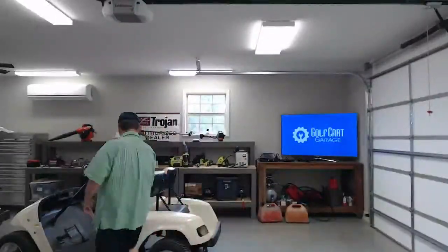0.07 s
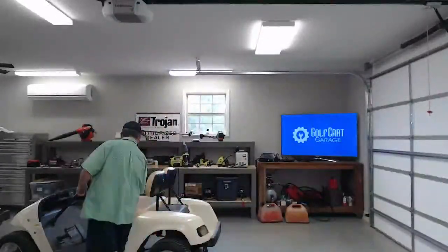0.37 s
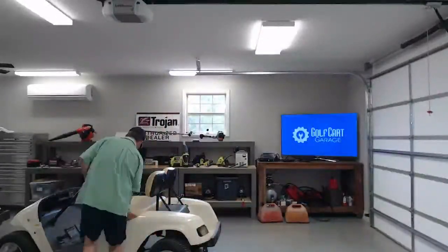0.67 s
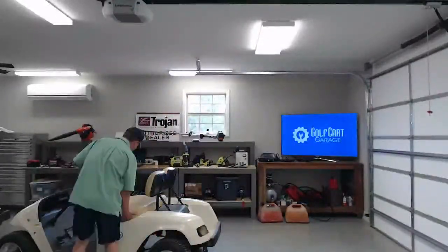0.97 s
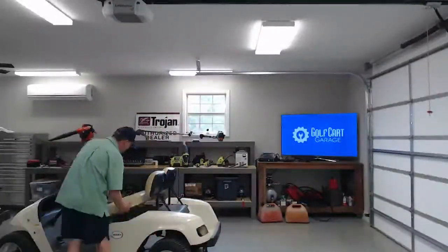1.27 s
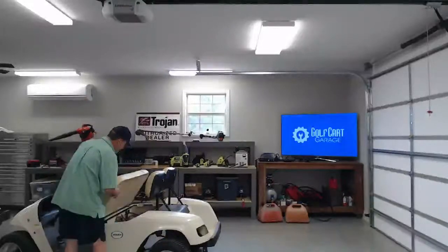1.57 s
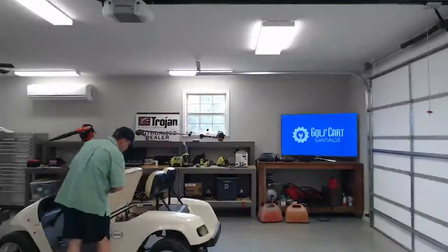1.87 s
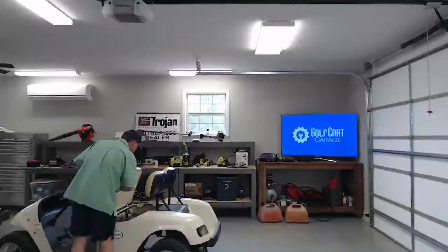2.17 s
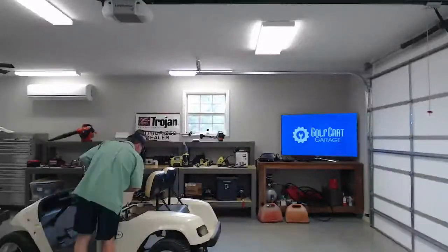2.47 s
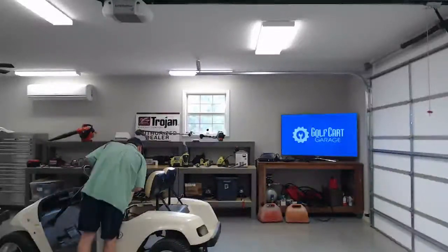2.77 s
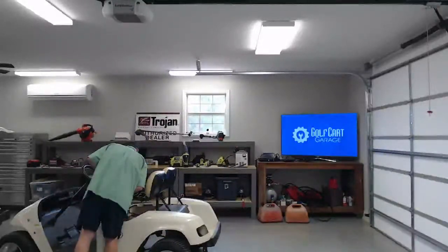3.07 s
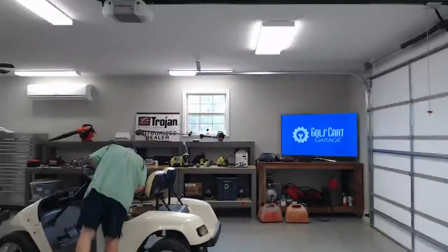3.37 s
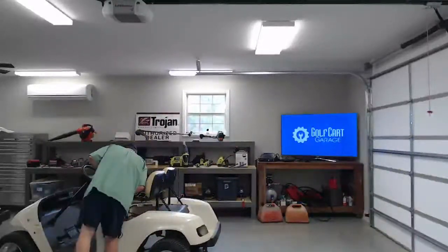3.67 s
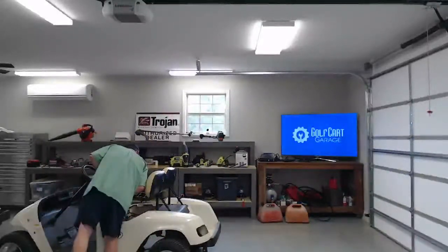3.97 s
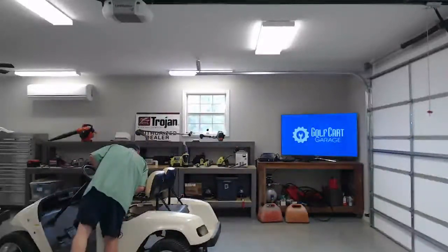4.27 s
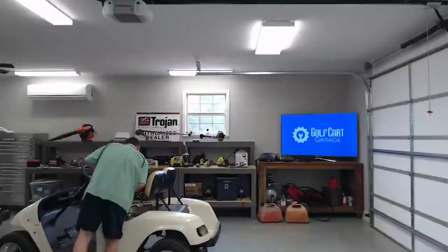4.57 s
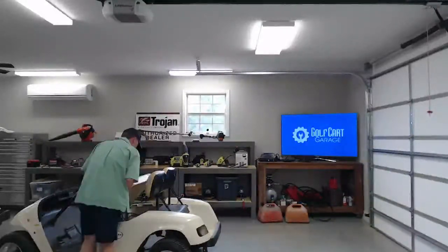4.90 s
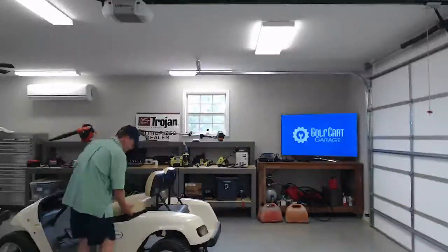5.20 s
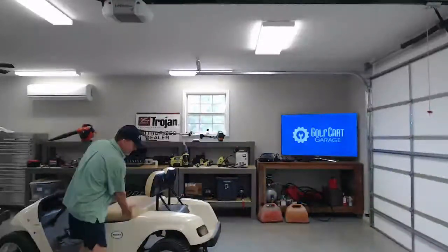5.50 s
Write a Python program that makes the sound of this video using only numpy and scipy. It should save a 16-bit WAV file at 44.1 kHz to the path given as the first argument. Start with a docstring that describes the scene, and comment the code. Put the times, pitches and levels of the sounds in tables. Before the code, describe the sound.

An air conditioner hums and blows steadily in a garage while someone lifts a golf cart seat: a quick run of hollow knocks, a short scrape, one more knock. After some soft, muffled rummaging, the seat is lowered, groaning briefly as it sticks on the plastic body, and lands with a bang, the loudest sound. The microphone hears it all a little from the left, with a short echo off the walls.

```python
"""A golf cart seat is tipped up in a bare garage and pulls out of its clips with a hollow clatter.
Hands rummage underneath; then the seat comes down, groans as it sticks and slips on the plastic body,
touches and drops home with a bang. Each blow is a crack, a knock, ringing panels and a hollow thump.
The hard walls answer every knock, and an air conditioner hums and blows all the while."""
import sys
import numpy as np
from scipy import signal
from scipy.fft import rfft, irfft, next_fast_len
from scipy.io import wavfile
from scipy.ndimage import map_coordinates

SR = 44100
rng = np.random.default_rng(int(sys.argv[2]) if len(sys.argv) > 2 else 0)


def log_audio(samples):
    """Write samples as a 16-bit WAV file to the path given in sys.argv[1]."""
    # one column per channel
    frames = np.atleast_2d(samples).T
    # limit to full scale, then quantise
    limited = np.clip(frames, -1, 1)
    pcm = np.round(limited * 32767).astype(np.int16)
    wavfile.write(sys.argv[1], SR, pcm)


N = 248724

# The clatter and the bang. Each row: start in seconds, then force, hardness and weight in dB.
SEAT_BLOWS = [(0.125, -60.5, -2, -11), (0.745, -42.5, -3, -11), (0.773, -39, -5.5, -5),
              (0.804, -34.5, 0.5, -6), (0.822, -39, -4, -1.5), (0.885, -48, 3, -2), (0.913, -51, -2, 2),
              (0.953, -45.5, 2.5, -6), (1.517, -50.5, 5.5, -2.5), (1.585, -65.5, -11, 13),
              (4.748, -52.5, -5.5, -1), (5.466, -41.5, -2.5, -1.5), (5.476, -40, -4.5, -8),
              (5.54, -46, -3, 3), (5.579, -32.5, -5, -3), (5.588, -26.5, 11.5, 3.5), (5.598, -26.5, -4, 9)]

def seat_blows():
    """The seat strikes the body; each part of the hit gets its own amount of wall echo."""
    out = np.zeros((2, N + SR))
    for start, force_db, hard_db, weight_db in SEAT_BLOWS:
        crack, knock, rings, thump = rocking(force_db, hard_db, weight_db, count=3)
        heard = garage(crack, wet_db=1.5) + garage(knock, wet_db=6)
        heard += garage(rings, wet_db=0.5) + garage(thump, wet_db=-5.5)
        out[:, round(start * SR):][:, :len(crack)] += heard
    return out[:, :N]


def rocking(force_db, hard_db, weight_db, count):
    """The seat hits and rocks back, each contact weaker, softer and with more weight behind it."""
    t = np.arange(SR * 3 // 4) / SR
    start, parts = 0, 0
    for k in range(count):
        age = np.maximum(t - start, 0)
        parts = parts + contact(age, force_db - 4 * k, hard_db - 5.5 * k, weight_db + 3.5 * k)
        start += 0.021 * 0.7 ** k  # ever shorter gaps
    return parts


# The edge's bright crack and dull knock. Each row: frequency in Hz, relative level in dB.
CRACK_SPECTRUM = [(300, -24.5), (900, -9), (1650, 1.5), (2500, 0.5), (3300, -2), (4700, -9.5), (5450, -8.5),
                  (6400, -13), (7600, -22.5), (8600, -42.5)]
KNOCK_SPECTRUM = [(60, -19), (150, 0.5), (350, -4), (550, -4), (800, -5.5), (1200, -10.5), (1700, -15.5),
                  (2500, -23), (5000, -29.5), (8500, -50.5)]
# The ring of the plastic panels, the board under the cushion and the hollow body.
# Each row: frequency in Hz, relative level in dB, seconds to fade by 60 dB.
PANEL_MODES = [(340, -4.5, 0.15), (405.3, -3.5, 0.19), (456, -2.5, 0.079), (501.6, 1, 0.089),
               (577, -9, 0.13), (652, -8.5, 0.1), (850, -7.5, 0.12), (980, -12, 0.19), (1273, -22, 0.081)]
BOARD_MODES = [(203, -22, 0.091), (296.5, 1.5, 0.12), (1420, -19, 0.055), (1577, -11, .06),
               (1680, -10.5, 0.08), (1780, -9, 0.046), (2210, -19.5, 0.033), (2497, -11, .05)]
HOLLOW_MODES = [(78, 3, 0.15), (101, -8.5, 0.11), (129.1, -1, 0.28), (166, -4, 0.14), (202, -10, 0.14)]

def contact(t, force_db, hard_db, weight_db):
    """The edge cracks, knocks and rings the panels; then the weight thumps the body and the board."""
    tilt_db = 0.5 - 0.25 * weight_db  # a heavy contact lasts longer, which dulls the crack
    crack = amp(-4 + hard_db) * burst(CRACK_SPECTRUM, t, t60=0.071, tilt_db=tilt_db) * rise(t, 0.00048)
    knock = burst(KNOCK_SPECTRUM, t, t60=0.057) * rise(t, 0.00082)
    # Weight flexes the panels more; a hard contact also reaches the board.
    panels = amp(-5.5 + 0.47 * weight_db) * ring(PANEL_MODES, t, scatter_db=3.5)
    late = np.maximum(t - 0.005, 0)  # the weight follows the edge
    board = amp(-12 + 1.16 * hard_db + weight_db) * ring(BOARD_MODES, late, scatter_db=2.5)
    thump = amp(-2 + weight_db) * ring(HOLLOW_MODES, late, scatter_db=3.5) * rise(late, 0.003)
    return amp(force_db) * np.array([crack, knock, panels + board, thump])


def burst(spectrum, t, t60, tilt_db=0):
    """Crowded modes that die quickly, as a noise burst tilted by tilt_db per octave."""
    tilted = [(hz, db + tilt_db * np.log2(hz)) for hz, db in spectrum]
    return coloured(rng.standard_normal(len(t)), tilted) * amp(-60 * t / t60)


def ring(modes, t, scatter_db):
    """Damped modes, struck at new strengths each time; neighbours swing in opposite directions."""
    hz, db, t60 = np.transpose(modes)[:, :, None]
    polarity = (-1) ** np.arange(len(hz))[:, None]
    gain = polarity * amp(db + scatter_db * rng.standard_normal(hz.shape))
    return np.sum(gain * amp(-60 * t / t60) * np.sin(2 * np.pi * hz * t), axis=0)


# The groan on the way down. Each row: start and length in seconds, level in dB, slips per second.
GROAN_STROKES = [(4.996, 0.049, -33, 134), (5.037, 0.067, -31.5, 130), (5.119, 0.061, -34, 124),
                 (5.189, 0.035, -45.5, 150)]
# Body modes shaken by the groan. Each row: frequency in Hz, level in dB relative to the low note.
SHAKEN_MODES = [(118, -18), (163, -11.5), (178, -11), (196, -17), (232, -22.5)]

def seat_groan():
    """The seat sticks and slips on the body; uneven slips shake other modes around the low note."""
    t, out = np.arange(N) / SR, np.zeros(N)
    shaken = sum(amp(db) * np.sin(2 * np.pi * hz * t + 1.6 * wobble(20)) for hz, db in SHAKEN_MODES)
    for start, length, db, slip_hz in GROAN_STROKES:
        pitch = slip_hz * (1 + 0.011 * wobble(40))
        note = np.sin(2 * np.pi * np.cumsum(pitch) / SR)
        out += amp(db) * stroke(start, length, attack_s=0.018, release_s=0.015) * (note + shaken)
    return garage(out, wet_db=-10.0)


# Scrapes as the seat goes up. Each row: start and length in seconds, level in dB.
SLIDE_STROKES = [(0.0, .12, -66), (.24, .03, -64), (.32, 0.26, -69), (1.257, 0.049, -48.5),
                 (1.325, 0.069, -58), (1.41, 0.067, -62)]
# Their raspy colour. Each row: frequency in Hz, relative level in dB.
SCRAPE_SPECTRUM = [(150, -22), (600, -17), (850, -1), (1170, 0.5), (1450, -6), (1800, -2), (2400, -8.5),
                   (3500, -9), (4700, -14.5), (5500, -13.5), (6700, -18.5), (8300, -35)]

def seat_slide():
    """The seat slides out of its clips and sleeves brush it."""
    gain = strokes(SLIDE_STROKES, attack_s=0.035, release_s=0.03)
    return rubbing(gain, SCRAPE_SPECTRUM, grain_db=4, grain_rate=160)


# Rubs as the seat comes down. Each row: start and length in seconds, level in dB.
CUSHION_STROKES = [(4.9, 0.12, -65), (5.0, .12, -58.5), (5.12, 0.083, -56.5), (5.38, .2, -67)]
# The swish of vinyl. Each row: frequency in Hz, relative level in dB.
VINYL_SPECTRUM = [(300, -8), (600, -7), (1000, -2.5), (1700, -2.5), (2050, -4.5), (2400, -3), (3200, -13.5),
                  (5500, -15), (8300, -31)]

def cushion_rub():
    """The vinyl cushion rubs down the backrest."""
    gain = strokes(CUSHION_STROKES, attack_s=0.025, release_s=0.031)
    return rubbing(gain, VINYL_SPECTRUM, grain_db=2.0, grain_rate=140)


# Hand movements. Each row: start and length in seconds, level in dB.
HAND_STROKES = [(0.0, 0.52, -84), (1.05, 0.57, -72.5), (2.35, 0.29, -74.5), (3.13, 0.27, -70),
                (3.33, 0.075, -60.5), (4.38, 0.057, -63.5), (5.03, 0.17, -59.5)]
# Their muffled colour. Each row: frequency in Hz, relative level in dB.
RUMMAGE_SPECTRUM = [(70, -19), (150, -4), (250, -0.5), (370, -0.5), (550, -7.5), (800, -13.5), (1500, -23),
                    (5000, -44)]

def rummaging_hands():
    """Hands work under the seat, with a faint rustle between the strokes."""
    gain = amp(-71) + strokes(HAND_STROKES, attack_s=0.031, release_s=0.05)
    return rubbing(gain, RUMMAGE_SPECTRUM, grain_db=1.0, grain_rate=73)


def rubbing(gain, spectrum, grain_db, grain_rate):
    """Friction: tiny uneven catches under the stroke, echoed by the walls."""
    catches = rng.standard_normal(N) * amp(grain_db * wobble(grain_rate))
    return garage(gain * coloured(catches, spectrum), wet_db=0.5)


# The reverb tail. Each row: frequency in Hz, seconds to fade by 60 dB.
GARAGE_DECAY = [(60, 0.56), (150, 0.73), (400, 0.73), (1000, 0.56), (3000, 1), (8000, 0.4)]
# Its stereo width. Each row: frequency in Hz, left-right correlation.
ECHO_CORRELATION = [(30, 0.96), (400, 0.95), (700, 0.89), (1100, .6), (1700, 0.22), (2800, -0.26),
                    (8000, 0.32)]

def garage(x, wet_db):
    """The direct sound plus the walls' answer, each frequency dying at its own speed."""
    hz, t, bands = signal.stft(diffuse(ECHO_CORRELATION, size=SR * 3 // 4), SR, nperseg=256)
    decay = amp(-60 * t / along(GARAGE_DECAY, hz)[:, None])
    tail = signal.istft(bands * decay, SR, nperseg=256)[1]
    tail *= rise(np.arange(tail.shape[1]) / SR, 0.0015)  # echoes take a moment to thicken
    echoes = signal.fftconvolve(x[None], tail / np.linalg.norm(tail[0]), axes=1)[:, :len(x)]
    direct = np.array([x, np.pad(x, (2, 0))[:len(x)]])  # the cart's sound arrives on the left first
    return direct + amp(wet_db) * echoes


# Compressor and mains hum, and a thin motor whine. Each row: frequency in Hz, level in dB.
HUM_TONES = [(28.5, -70), (37.7, -63), (75.4, -53.5), (113.1, -69), (119.5, -63.5), (242.2, -76),
             (338, -84.5)]
WHINE_TONES = [(3200, -80)]
# The rush of the fan. Each row: frequency in Hz, relative level in dB.
FAN_SPECTRUM = [(20, -3), (60, 4), (100, -0.5), (160, 1), (250, -9.5), (420, -6), (700, -8.5), (1100, -15),
                (1900, -17), (2500, -14.5), (3150, -10.5), (4300, -19.5), (5600, -22.5), (7900, -31),
                (8800, -56)]
# Its stereo width. Each row: frequency in Hz, left-right correlation.
FAN_CORRELATION = [(30, 0.86), (500, 0.9), (1000, 0.93), (1900, 0.6), (2900, 0.89), (4500, 0.58),
                   (6500, .42), (8000, 0)]

def air_conditioner():
    """The compressor hums, the motor whines and the fan blows; a very faint high tone pulses."""
    t = np.arange(N) / SR

    def tone(hz, drift):
        return np.sqrt(2) * np.sin(2 * np.pi * (hz * t + rng.random()) + drift * wobble(3.04))

    hum = sum(amp(db) * tone(hz, drift=0.00067 * hz) for hz, db in HUM_TONES)
    whine = sum(amp(db) * tone(hz, drift=0.76) for hz, db in WHINE_TONES)
    high_tone = amp(-97 + 2.2 * wobble(0.4)) * tone(hz=8020, drift=0.3)
    pulses = 1 + np.sin(2 * np.pi * 25 * t)
    fan = coloured(diffuse(FAN_CORRELATION, size=N), FAN_SPECTRUM) * amp(-58.5 + 0.16 * wobble(3.0))
    return hum + whine + high_tone * pulses + fan


def diffuse(correlation, size):
    """Noise from all sides, with the given left-right correlation at each frequency."""
    def mid_side_gains(hz):
        angle = np.arccos(np.clip(along(correlation, hz), -1, 1)) / 2
        return np.array([np.cos(angle), np.sin(angle)])

    mid, side = filtered(rng.standard_normal((2, size)), mid_side_gains)
    return np.array([mid + side, mid - side])


def stroke(start, length, attack_s, release_s):
    """An envelope that rises, holds to the end of the stroke, then dies away."""
    t = np.arange(N) / SR - start
    return np.clip(t / attack_s, 0, 1) * np.exp(-np.maximum(t - length, 0) / release_s)


def strokes(rows, attack_s, release_s):
    """The envelope of a series of strokes, added in power."""
    gains = (amp(db) * stroke(start, length, attack_s, release_s) for start, length, db in rows)
    return np.sqrt(sum(gain ** 2 for gain in gains))


def rise(t, attack_s):
    """A rounded attack from 0 towards 1."""
    return 1 - np.exp(-t / attack_s)


def wobble(rate):
    """A smooth random curve, rate knots a second."""
    return map_coordinates(rng.standard_normal(int(N * rate / SR) + 4), [np.arange(N) * rate / SR])


def coloured(x, spectrum):
    """x shaped by the given spectrum, at rms 1."""
    shaped = filtered(x, lambda hz: amp(along(spectrum, hz)))
    return shaped / np.sqrt(np.mean(shaped ** 2) + 1e-20)


def filtered(x, response):
    """An equaliser whose gain is response(hz)."""
    n = x.shape[-1]
    padded = next_fast_len(n + 8192)
    return irfft(rfft(x, padded) * response(np.fft.rfftfreq(padded, 1 / SR)), padded)[..., :n]


def along(points, hz):
    """Interpolate (Hz, value) points on a log frequency axis."""
    knots_hz, values = np.transpose(points)
    return np.interp(np.log(hz + 1), np.log(knots_hz + 1), values)


def amp(db):
    """Decibels to gain."""
    return 10 ** (np.asarray(db) / 20)


# The pan of the whole mix. Each row: frequency in Hz, left minus right in dB.
LEFT_LEAN = [(60, 5), (100, 6), (180, 5), (310, 4.5), (530, 3.5), (920, 4), (1590, 3.5), (2740, 2.0),
             (4730, 1), (8160, 3)]

def scene():
    """Everything in the garage; the cart and the air conditioner stand to the left."""
    friction = seat_slide() + cushion_rub() + rummaging_hands()
    mix = seat_blows() + seat_groan() + friction + air_conditioner()
    return filtered(mix, lambda hz: amp(np.outer([0.5, -0.5], along(LEFT_LEAN, hz))))


def record(dry):
    """A steep low-pass takes off the treble above 8600 Hz."""
    return filtered(dry, lambda hz: 1 / np.sqrt(1 + (hz / 8600) ** 120))


dry = scene()
out = record(dry)
log_audio(out)
```